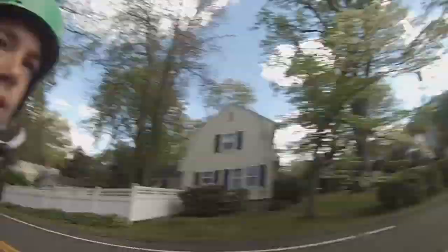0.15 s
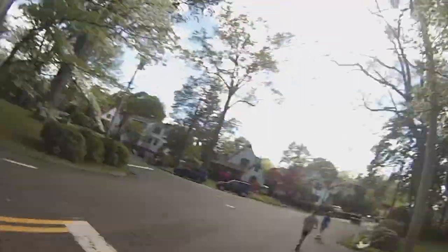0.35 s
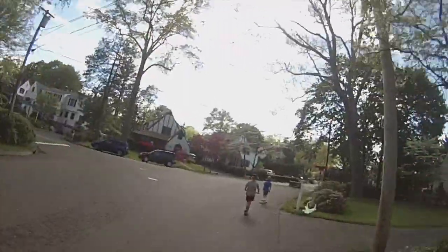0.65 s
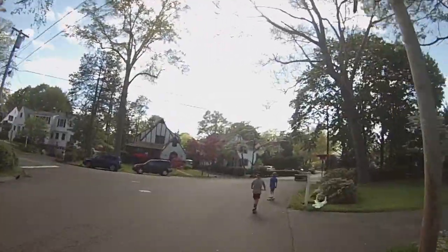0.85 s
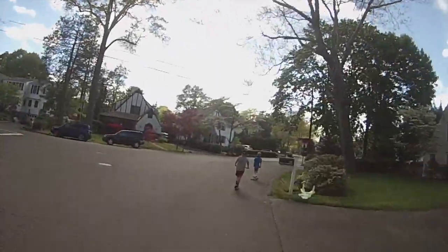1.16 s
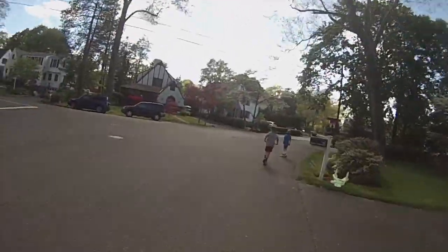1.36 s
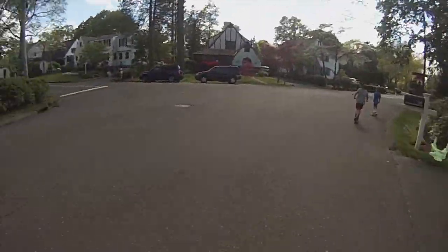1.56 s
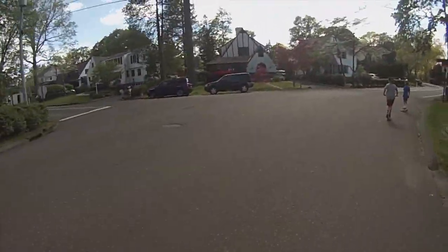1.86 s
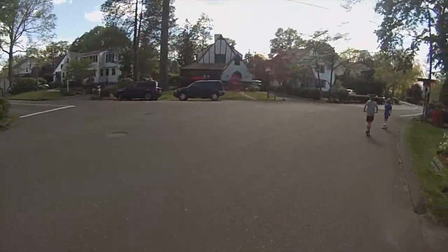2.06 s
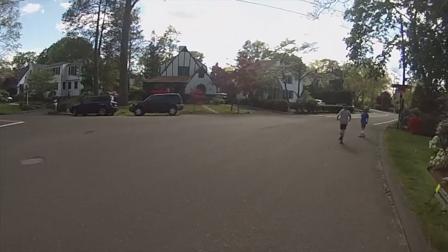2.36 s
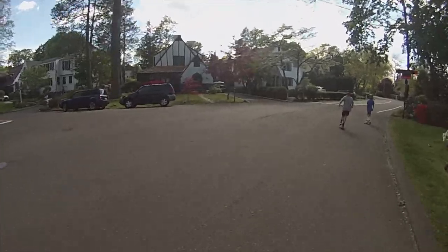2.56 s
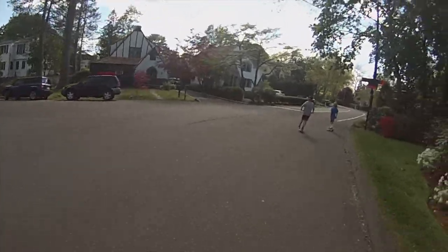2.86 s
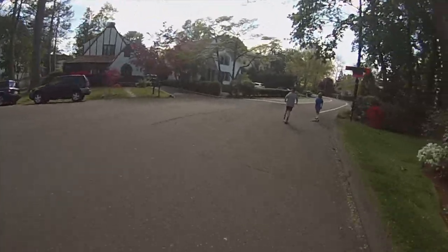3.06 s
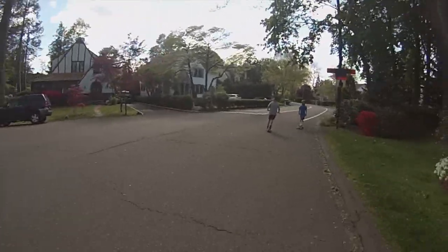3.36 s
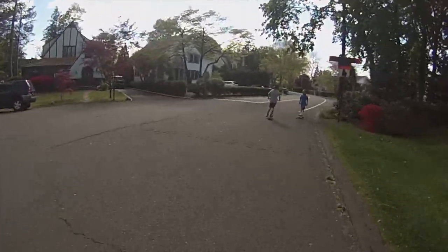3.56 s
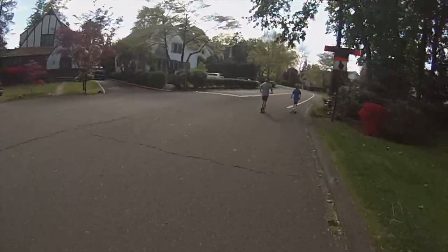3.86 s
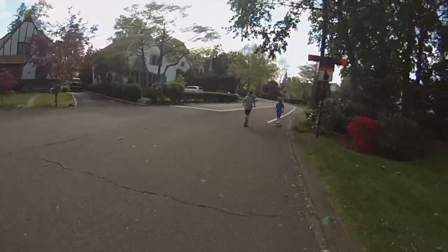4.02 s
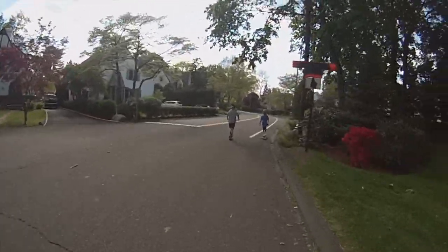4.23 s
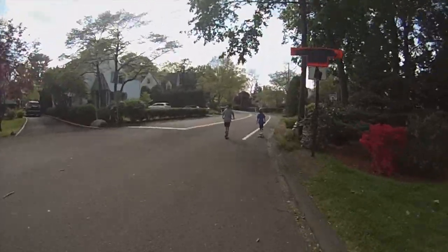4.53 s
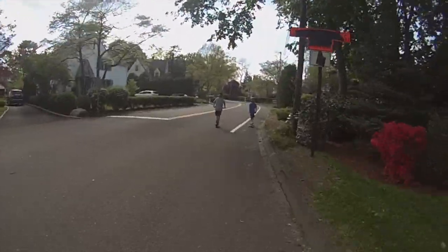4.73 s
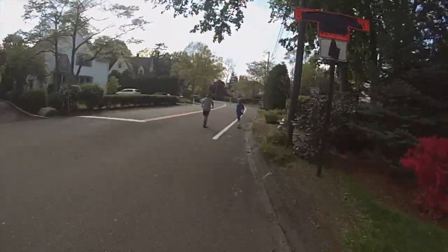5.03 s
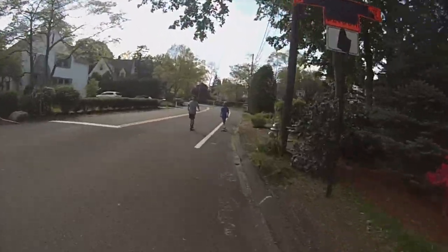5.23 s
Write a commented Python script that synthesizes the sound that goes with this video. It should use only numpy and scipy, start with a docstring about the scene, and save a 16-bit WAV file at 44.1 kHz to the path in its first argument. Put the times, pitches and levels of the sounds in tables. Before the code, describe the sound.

Busy plastic handling knocks and wind buffeting at the start thin out over a quiet, steady rumble of board wheels on road.

```python
"""Wheels drone and hiss over asphalt, wind thumps, and a hand rubs and clicks on a plastic housing.
A longboard rolls along while the rider swings a hand-held action camera round to face the road.
Road and wind are shaped noise; the wind rushes up once as the camera swings.
Each rub is friction noise coloured by the housing; each click rings the shell and sways the mount.
Near the end a jolt sets off a low boom with a few hollow tones."""
import sys
import numpy as np
from scipy import signal
from scipy.fft import rfft, irfft, next_fast_len
from scipy.io import wavfile
from scipy.ndimage import uniform_filter1d, map_coordinates

SR = 44100
rng = np.random.default_rng(int(sys.argv[2]) if len(sys.argv) > 2 else 0)


def unload_wav(signal):
    """Save mono or channel-first audio to the path in sys.argv[1] as 16-bit WAV at rate SR, clipped to [-1, 1]."""
    wavfile.write(
        sys.argv[1],
        SR,
        np.round(np.clip(np.atleast_2d(signal).T, -1, 1) * 32767).astype(np.int16),
    )


N = 237630

# Rolling. Each row: time in seconds, wheel drone in dB, road hiss in dB before ROAD_HISS_DB.
ROLLING_LEVELS = [(0.0, -49.5, -49), (0.3, -50.5, -49.5), (0.75, -53, -54), (2.0, -53, -55.5),
                  (2.6, -52, -53.5), (3.6, -53.5, -55), (5.15, -54, -54.5), (5.39, -57, -50)]
# Wind on the housing. Each row: time in seconds, level in dB before WIND_GAIN_DB and the gusts.
WIND_LEVELS = [(0.0, -26.5), (0.15, -29.5), (0.42, -39), (0.7, -39), (0.85, -42), (1.9, -46.5), (2.4, -38),
               (2.87, -45.5), (3.5, -49.5), (4.7, -52), (5.39, -44)]
# Tone colour of the wheel drone. Each row: frequency in Hz, relative level in dB per Hz.
DRONE_COLOUR = [(60, -19), (130, -5.5), (230, -9.5), (330, -6.5), (420, -3.5), (530, 3.5), (600, -4.5),
                (700, -13.5), (850, -26), (1500, -91)]
# Tone colour of the road hiss. Each row: frequency in Hz, relative level in dB per Hz.
HISS_COLOUR = [(200, -1.5), (700, -6), (1200, -3), (1700, 1), (2100, -5.5), (3000, -3), (3700, -5),
               (4200, -11), (6000, -14.5), (9000, -19), (14000, -24.5), (16000, -33)]
# Tone colour of the wind. Each row: frequency in Hz, relative level in dB per Hz.
WIND_COLOUR = [(8, -37), (22, -0.5), (42, -8.5), (70, -10), (110, -31.5), (200, -34), (500, -42.5),
               (1500, -101)]
# Air resonances of the housing, heard in the hiss. Each row: centre in Hz, width in Hz, boost in dB.
AIR_RESONANCES = [(955, 255, 8.5), (1427, 138, 8), (2300, 230, 7), (3490, 380, 4.5)]
# The hand sliding on the grip. Each row: time of full strength in seconds, hold in seconds,
# release in seconds, level in dB before RUB_GAIN_DB, tilt in dB per octave.
RUB_STROKES = [(.01, 0.016, .005, -47.5, 6.5), (.042, 0.0047, 0.0045, -32, -2.5),
               (0.075, 0.01, 0.0036, -37, 2.5), (0.186, 0.026, 0.0076, -36.5, -3.5),
               (0.234, 0.017, .021, -31.5, 1), (.366, 0.01, .018, -29.5, -3.5),
               (0.465, 0.016, 0.012, -39, 1), (0.591, 0.054, 0.0095, -35.5, -2.5),
               (0.671, 0.044, 0.014, -33.5, -2), (0.831, 0.095, .05, -54.5, 0.5),
               (1.142, 0.019, .014, -40, -1), (1.222, 0.014, .025, -51, 1), (1.354, 0.037, 0.023, -51, .5),
               (1.716, 0.014, .022, -40.5, -3), (1.839, 0.011, 0.021, -46.5, -3.5),
               (2.525, 0.011, 0.012, -47, 0.5), (2.55, 0.035, 0.018, -32, -0.4),
               (2.636, 0.014, 0.01, -40, 0), (2.827, 0.13, 0.014, -52.5, 2),
               (3.169, 0.04, 0.018, -46.5, -3.5), (3.23, .062, 0.026, -31, 2.5),
               (3.35, 0.065, 0.016, -46, 2.5), (3.959, 0.038, .011, -40, 1),
               (4.594, 0.012, 0.0078, -43, -5), (4.792, 0.0071, 0.0082, -48, 2),
               (5.323, 0.0048, 0.0065, -39, 0), (5.372, .02, .01, -48.5, 2)]
# Skin on plastic. Each row: frequency in Hz, level in dB per Hz before SKIN_DB.
SKIN_COLOUR = [(60, 0), (200, 5), (420, -14.5), (650, 1), (1000, -2), (1250, -8.5), (1700, -1.5),
               (2600, 2.5), (3500, -5.5), (4500, -10), (6500, -13.5), (7600, -27), (9500, -21.5),
               (15000, -51)]
# Clicks of housing and mount. Each row: time in seconds, strength in dB before CLICK_GAIN_DB,
# contact pitch in Hz, knock in dB before KNOCK_GAIN_DB, crack in dB relative to the body of the click,
# sway of the mount in dB.
CLICK_EVENTS = [(.039, -23.5, 1650, -6.5, -14, -59), (.123, -20.5, 1070, -1.5, -10, -27),
                (0.159, -31, 1700, -4, -16, -51), (0.237, -20.5, 1410, -10, -11, -25.5),
                (.325, -33, 1680, -13, -18, -41), (.41, -23.5, 1970, -29, -8.5, -31),
                (.453, -22.5, 1510, 1, -9, -32), (.462, -5, 2690, -17.5, -17, -48),
                (1.14, -17, 1650, -9, -19, -24.5), (1.354, -30.5, 1030, 4, -29, -34.5),
                (1.377, -23, 1520, -12.5, -40, -48), (1.589, -36.5, 2400, -13, -10.5, -53),
                (1.901, -45, 1740, -29, -6, -35.5), (2.306, -15, 2290, -7.5, -18, -28.5),
                (3.41, -35, 2920, -20, -4, -52), (3.752, -35, 2030, -20, -15, -40),
                (3.952, -29, 1700, -10, -11, -37), (4.579, -39, 3000, -19, -3, -48),
                (4.605, -30, 1580, -33, -34, -45), (4.766, -25, 2420, -21, -11, -47.5)]
# Modes of the plastic shell, the low four first. Each row: centre in Hz, width in Hz before SHELL_WIDEN,
# level in dB before the knock (low modes) or SHELL_DB (high modes).
SHELL_MODES = [(174, 71, 2), (294, 15.5, 6), (530, 52, -33), (760, 420, -2.5), (1020, 65, 2.5),
               (1546, 360, -1.5), (2250, 150, 1.5), (3170, 530, -2.5), (3720, 190, -19.5), (4500, 91, -7.5)]
# The sharp edge of a click. Each row: frequency in Hz, relative level in dB per Hz.
CRACK_COLOUR = [(2500, -5), (5700, 0), (7500, -8.5), (8500, -13), (10500, -16.5), (15000, -33)]
# Housing resonances while the hand turns the camera.
# Each row: centre in Hz, width in Hz before HAND_DAMPING_HZ, level in dB.
TURNING = [(726, 49, -5), (1030, 16, -8), (1705, 230, -1), (2910, 85, -2.5), (3960, 37, -46),
           (4450, 65, -10), (7790, 69, -17.5)]
# The same while the hand settles. Each row: centre in Hz, width in Hz before damping, level in dB.
SETTLING = [(1180, 57, -0.5), (1650, 56, 5), (2360, 32, 6.5), (3350, 82, 4), (4100, 310, -5.5),
            (5520, 110, -10), (7510, 44, -9.5)]
# The same while the hand slides. Each row: centre in Hz, width in Hz before damping, level in dB.
SLIDING = [(1067, 52, 10.5), (1390, 83, 2.5), (1700, 38, 6.5), (2370, 71, 9), (2940, 66, 0), (3170, 31, 6),
           (4100, 180, 2.5), (7460, 40, -15)]
# The same while the hand rests. Each row: centre in Hz, width in Hz before damping, level in dB.
RESTING = [(490, 60, 4), (1690, 180, 10), (2400, 93, 7), (3320, 86, -2), (3880, 64, 5), (5330, 140, -44),
           (7420, 35, -18)]
# The holds of the hand in turn. Each row: end in seconds, the housing resonances for that hold.
HOLDS = [(2.0, TURNING), (3.05, SETTLING), (3.7, SLIDING), (9, RESTING)]
# A jolt that sets the whole mount ringing. One row: time in seconds, level in dB.
JOLT_EVENT = (5.317, -17.5)
# Tones of the jolted mount. Each row: pitch in Hz, relative level in dB, time to fall 60 dB in seconds.
MOUNT_TONES = [(80, 0, .19), (711, -17, .06), (1700, -20, .055), (2611, -25, .09)]
# The rush of air as the camera swings round. One row: crest in seconds, width in seconds,
# level in dB before WIND_GAIN_DB.
SWING_RUSH = (0.216, 0.018, -19)

MOUNT_HZ = 77.4  # the camera swaying on its grip; this pitch wanders during rubs
TOP_HZ = 15400  # nothing is kept above this
ROAD_HISS_DB, WIND_GAIN_DB = -3.0, -3
GUST_DB, GUSTS_PER_S = 3, 6.8  # strength of the gusts, and random points a second on their curve
RUB_GAIN_DB, SKIN_DB = -1.94, -7
PRESS_DB, SHUDDER_DB = -7.5, -8.5  # a sliding hand presses the housing and shakes the mount
PRESS_PER_TILT = 3.1  # dull strokes press harder: dB more for each dB per octave less tilt
PATCH_DB, JUDDER_DB = 4.0, 1.0  # uneven colour of each stroke; flutter of the rub as the mount sways
HAND_DAMPING_HZ = 90  # the hand widens every housing resonance by this much
ATTACK_S, ATTACK_SHARE = .005, .06  # a stroke's attack: seconds, plus this share of its hold
STROKE_SHAPE = 1.48  # flanks of a stroke: 1 pointed, 2 rounded
CLICK_GAIN_DB, KNOCK_GAIN_DB = 15, 7
CONTACT_Q, SHELL_DB, CHATTER_DB = 5, -7, -2.5  # sharpness of contact, high shell ring, loose chatter
SHELL_WIDEN = 1.37  # factor on the widths of the shell modes
CHATTER_T60, CRACK_T60, SWAY_T60 = .027, .0098, .16  # seconds to fall 60 dB
GIVE_DB, GIVE_S = -3.5, .015  # the mount yields under a blow: dB relative to its sway, time scale in seconds


def amp(db):
    """Turn decibels into a gain."""
    return 10 ** (np.asarray(db) / 20)


def unit(x):
    """Scale to an rms of 1."""
    return x / np.sqrt(np.mean(x ** 2) + 1e-20)


def unit_energy(x):
    """Scale to a total energy of 1."""
    return x / np.linalg.norm(x)


def along(points, hz):
    """Read a curve of (Hz, value) points on a log frequency axis."""
    f, v = np.transpose(points)
    return np.interp(np.log(hz + 1), np.log(f + 1), v)


def curves(rows):
    """Give one value per sample for each column after the time."""
    s, *cols = np.transpose(rows)
    return [np.interp(np.arange(N) / SR, s, c) for c in cols]


def wobble(rate):
    """Make a smooth random curve through rate random points a second."""
    return map_coordinates(rng.standard_normal(N // 8), [np.arange(N) * rate / SR], mode="wrap")


def coloured(x, gain_db):
    """Filter x with a gain in dB that is a function of frequency."""
    m = next_fast_len(len(x) + 8192)
    gain = amp(gain_db(np.fft.rfftfreq(m, 1 / SR)))
    return irfft(rfft(x, m) * gain, m)[:len(x)]


def bump(hz, centre_hz, width_hz):
    """Give a resonance's power shape, 1 at its centre."""
    return 1 / (1 + (2 * (hz - centre_hz) / width_hz) ** 2)


def grit(size, rate, spread_db):
    """Scatter tiny impacts of uneven strength, rate a second, at an rms of 1."""
    hits = rng.random(size) < rate / SR
    strength = amp(spread_db * rng.standard_normal(size))
    return unit(hits * strength * rng.standard_normal(size))


def add(track, s, sound):
    """Mix a sound into the track from time s on."""
    start = int(np.clip(round(s * SR), 0, N - 1))
    track[start:start + len(sound)] += sound[:N - start]


def swell(u, rise, hold, fall):
    """Shape attack, hold and release; full strength is reached at u = 0."""
    away = np.maximum(-u / rise, 0) + np.maximum((u - hold) / fall, 0)
    return np.exp(-.5 * away ** STROKE_SHAPE)


def struck(power):
    """Give the ring, starting at the blow and of energy 1, of a body with this power spectrum."""
    # folding the cepstrum (the spectrum of the log spectrum) puts the energy as early as possible
    cepstrum = irfft(.5 * np.log(power + 1e-12))
    half = len(cepstrum) // 2
    cepstrum[1:half] *= 2
    cepstrum[half + 1:] = 0
    return unit_energy(irfft(np.exp(rfft(cepstrum))))


def lumps():
    """Make slow lumps of pressure on the housing, all about equally strong, at an rms of 1."""
    eddies = unit(coloured(rng.standard_normal(N), lambda hz: along(WIND_COLOUR, hz)))
    power = np.abs(uniform_filter1d(eddies ** 2, size=SR // 16)) + 1e-6
    return unit(eddies / np.sqrt(power))


def wheels():
    """Asphalt stones drum on the wheels: wheels and deck drone, the contact hisses."""
    drone_db, hiss_db = curves(ROLLING_LEVELS)
    texture = wobble(rate=21)  # coarser and smoother patches of road

    def hiss_colour(hz):
        resonances = sum(db * bump(hz, centre, width) for centre, width, db in AIR_RESONANCES)
        return along(HISS_COLOUR, hz) + resonances

    drone = unit(coloured(grit(N, rate=3000, spread_db=3), lambda hz: along(DRONE_COLOUR, hz)))
    hiss = unit(coloured(rng.standard_normal(N), hiss_colour))
    drone_gain = amp(drone_db + 0.18 * texture)
    hiss_gain = amp(hiss_db + ROAD_HISS_DB + 0.49 * texture)
    return drone_gain * drone + hiss_gain * hiss


def wind():
    """Eddies press on the housing in gusts, with an extra rush while the camera swings round."""
    level_db, = curves(WIND_LEVELS)
    crest, width, swing_db = SWING_RUSH
    gusts = amp(level_db + GUST_DB * wobble(GUSTS_PER_S))
    swing = amp(swing_db) * swell(np.arange(N) / SR - crest, width, 0, width)
    return amp(WIND_GAIN_DB) * (gusts + swing) * lumps()


def jolt():
    """A bump swings the camera on its grip: fading sine tones make a low boom with hollow overtones."""
    out, t = np.zeros(N), np.arange(SR // 4) / SR
    s, db = JOLT_EVENT
    boom = sum(amp(db + level - 60 * t / t60) * np.sin(2 * np.pi * hz * t) for hz, level, t60 in MOUNT_TONES)
    soft_start = 1 - np.exp(-t / .003)
    add(out, s, boom * soft_start)
    return out


def rubs():
    """Skin slides on the grip: dense friction noise excites the housing and shakes the mount."""
    out, t = np.zeros(N), np.arange(SR // 2) / SR
    effort, weight = np.zeros(N), np.zeros(N)
    knots_hz = np.geomspace(200, 15000, num=60)
    # the mount sways near its own pitch, and the rub grows and shrinks with the sway
    sway_hz = MOUNT_HZ * (1 + 0.207 * wobble(rate=69))
    swaying = unit(np.sin(2 * np.pi * np.cumsum(sway_hz) / SR))
    for full_s, held, release, db, tilt in RUB_STROKES:
        rise = ATTACK_S + ATTACK_SHARE * held
        start = max(full_s - 5 * rise, 0)  # leaves room for the attack before full strength
        stroke = swell(t + start - full_s, rise, held, release)
        resonances = next(peaks for until, peaks in HOLDS if full_s < until)
        # every stroke has its own slightly uneven colour
        patches = np.column_stack([knots_hz, PATCH_DB * rng.standard_normal(len(knots_hz))])

        def rub_colour(hz):
            skin = amp(along(SKIN_COLOUR, hz) + SKIN_DB) ** 2
            housing = sum(amp(level) ** 2 * bump(hz, centre, width + HAND_DAMPING_HZ) ** 1.013
                          for centre, width, level in resonances)
            return 10 * np.log10(skin + housing) + along(patches, hz) + tilt * np.log2(hz + 300)

        friction = unit(coloured(rng.standard_normal(len(t)), rub_colour))
        add(out, start, amp(db + RUB_GAIN_DB) * stroke * friction)
        add(effort, start, amp(db) * stroke)
        add(weight, start, amp(db - PRESS_PER_TILT * tilt) * stroke)
    rubbing = out * amp(JUDDER_DB * swaying)
    shudder = amp(SHUDDER_DB) * effort * swaying
    pressing = amp(PRESS_DB) * weight * lumps()
    return rubbing + shudder + pressing


def clicks():
    """A blow and its brief chatter ring the contact and the shell, and set the mount swaying."""
    out, t = np.zeros(N), np.arange(SR // 4) / SR
    hz = np.fft.rfftfreq(4096, 1 / SR)
    # bending waves cross the shell, the low ones more slowly, which rounds off each blow
    travel = np.exp(-.9j * np.sqrt(hz))
    sway = np.sin(2 * np.pi * MOUNT_HZ * t) * amp(-60 * t / SWAY_T60)
    give = np.sin(t / GIVE_S * 2) * np.exp(-t / GIVE_S / 2)
    sway = sway + amp(GIVE_DB) * give
    for s, db, pitch_hz, knock_db, crack_db, sway_db in CLICK_EVENTS:
        shell = 0
        for k, (centre, width, level) in enumerate(SHELL_MODES):
            # the low modes follow the weight of the knock, the high ones keep a fixed level
            mode_db = level + (knock_db + KNOCK_GAIN_DB if k < 4 else SHELL_DB)
            shell = shell + amp(mode_db) ** 2 * bump(hz, centre, SHELL_WIDEN * width) ** 1.57
        contact = bump(hz, pitch_hz, pitch_hz / CONTACT_Q) ** 1.83
        ring = irfft(rfft(struck(contact + shell)) * travel)
        chatter = unit_energy(rng.standard_normal(len(t)) * amp(-60 * t / CHATTER_T60))
        blow = (t == 0) + amp(CHATTER_DB) * chatter
        body = unit_energy(signal.fftconvolve(blow, ring)[:len(t)])
        edge = coloured(rng.standard_normal(len(t)), lambda f: along(CRACK_COLOUR, f))
        crack = unit_energy(edge * amp(-60 * t / CRACK_T60))
        add(out, s, amp(db + CLICK_GAIN_DB) * (body + amp(crack_db) * crack))
        add(out, s, amp(sway_db) * sway)
    return out


def scene():
    """Road, wind and handling meet at one microphone."""
    return (wheels() + wind() + jolt() + rubs() + clicks())[None]


def record(dry):
    """The camera rounds off peaks near full scale, then cuts everything above TOP_HZ by 120 dB."""
    limited = dry / (1 + np.abs(dry / .95) ** 8) ** (1 / 8)
    return np.array([coloured(channel, lambda hz: -120.0 * (hz > TOP_HZ)) for channel in limited])


dry = scene()
out = record(dry)
unload_wav(out)
```